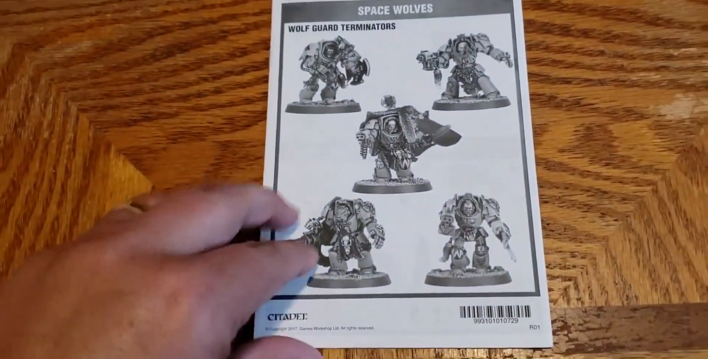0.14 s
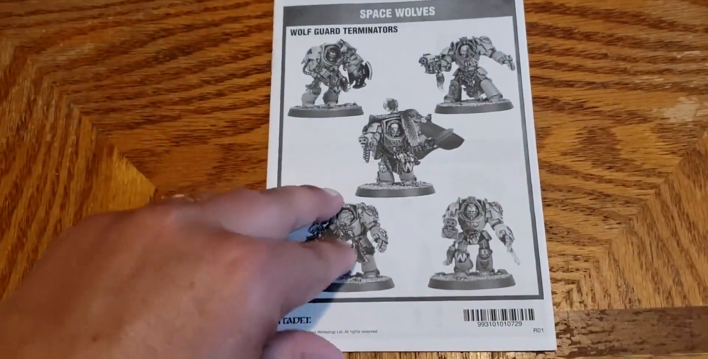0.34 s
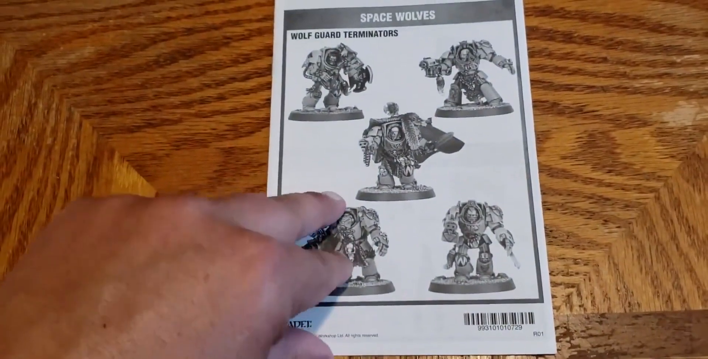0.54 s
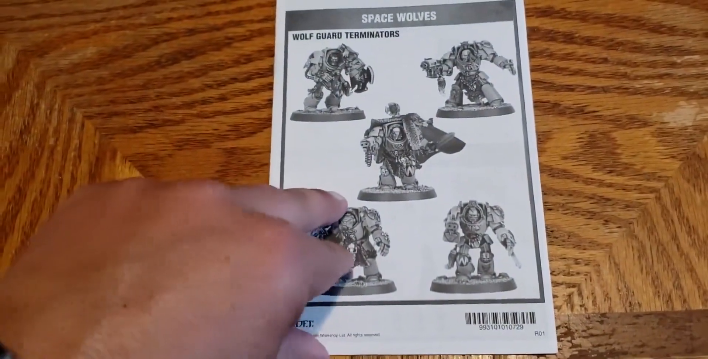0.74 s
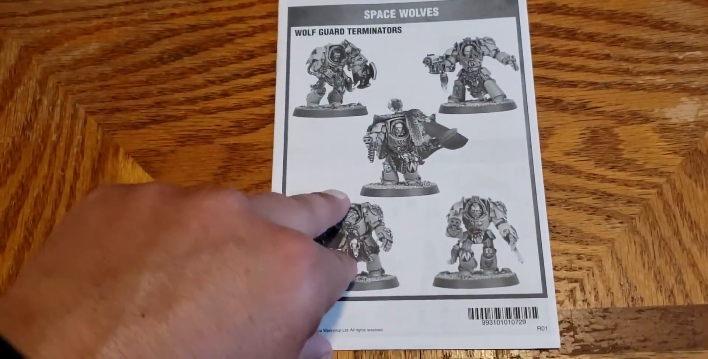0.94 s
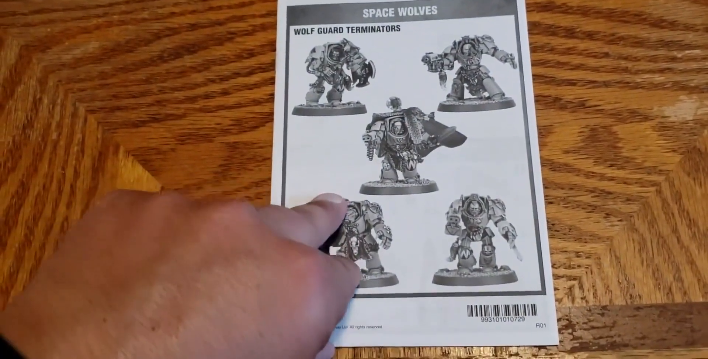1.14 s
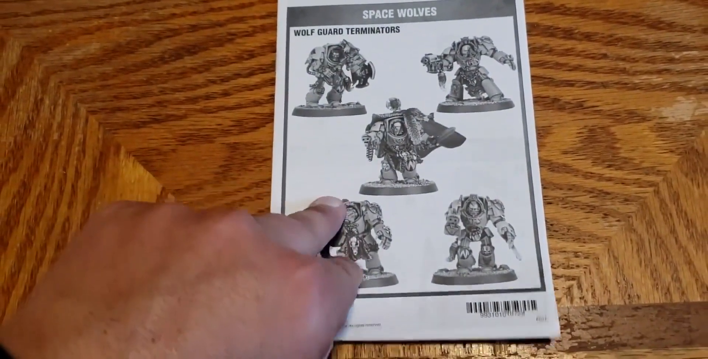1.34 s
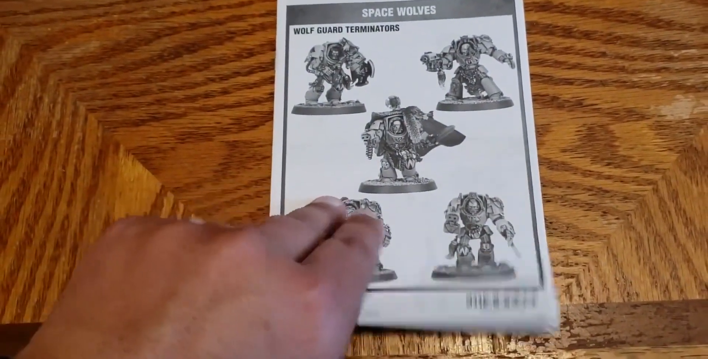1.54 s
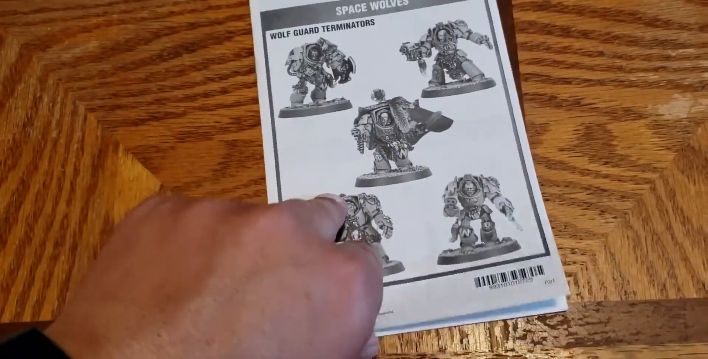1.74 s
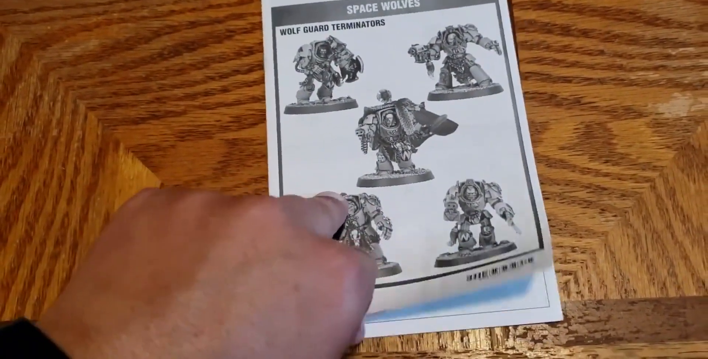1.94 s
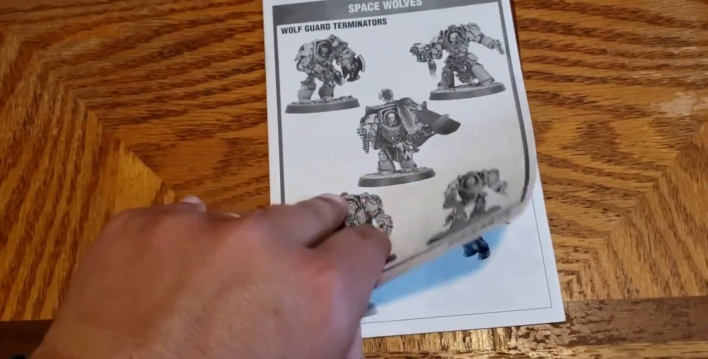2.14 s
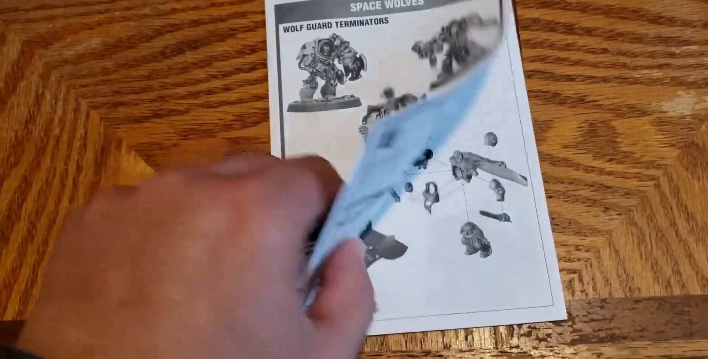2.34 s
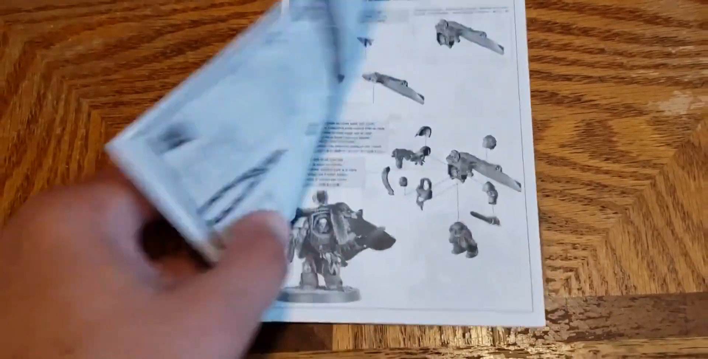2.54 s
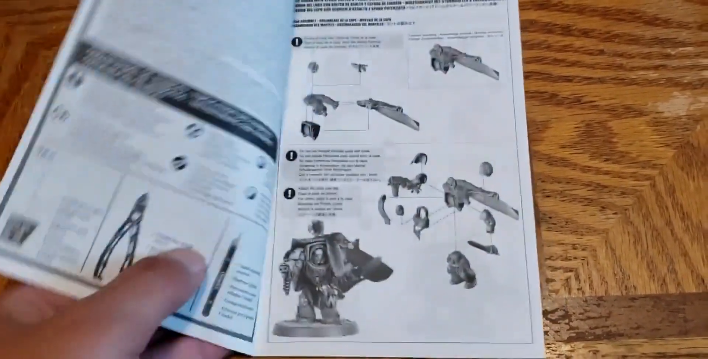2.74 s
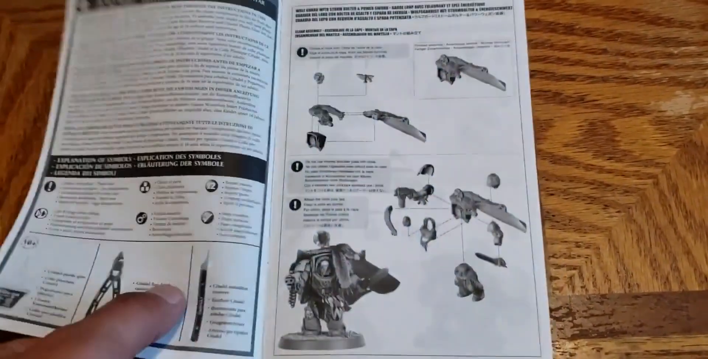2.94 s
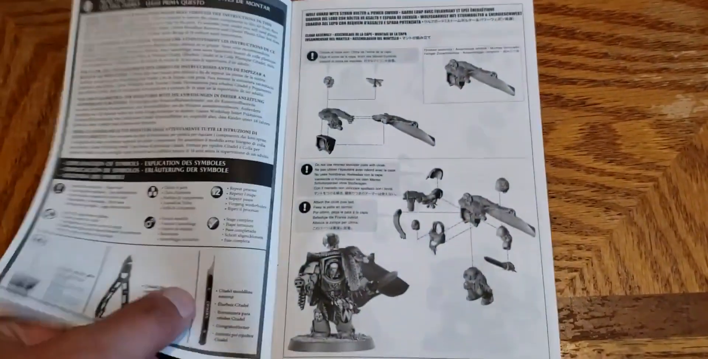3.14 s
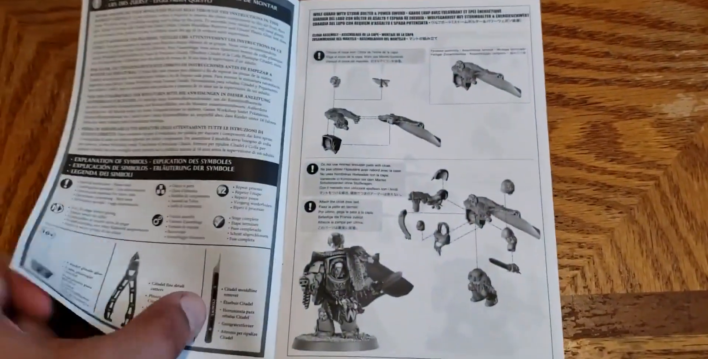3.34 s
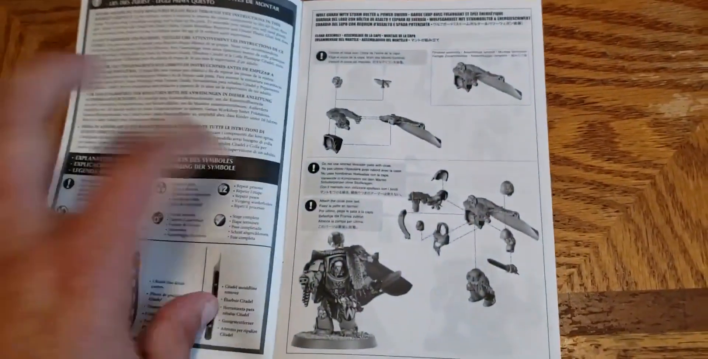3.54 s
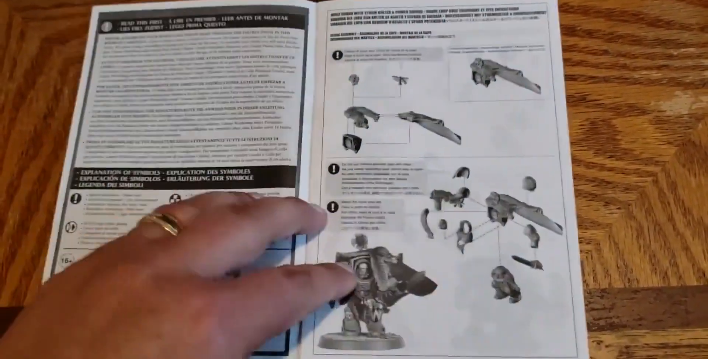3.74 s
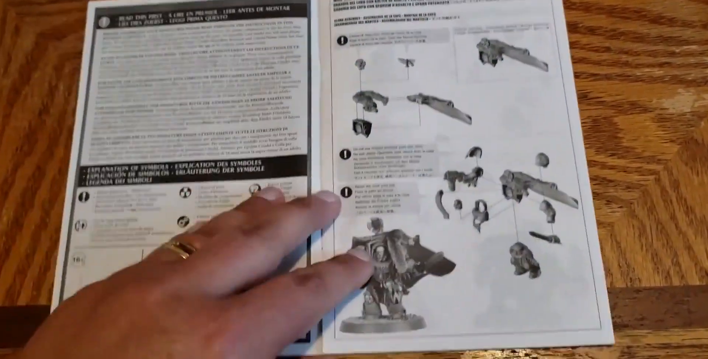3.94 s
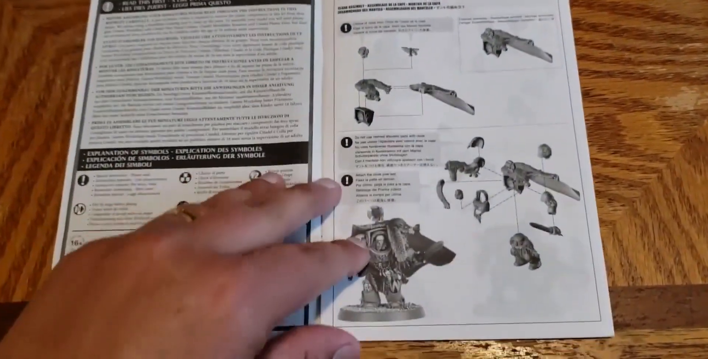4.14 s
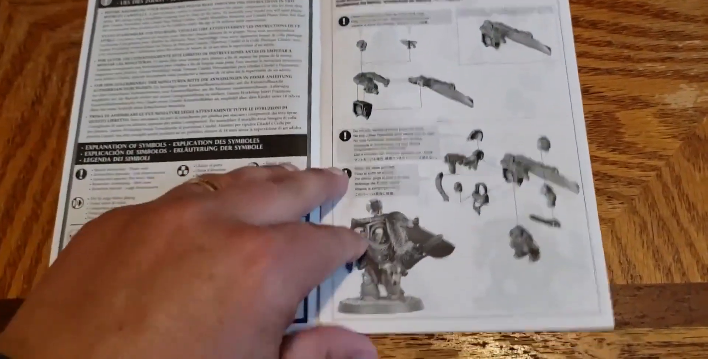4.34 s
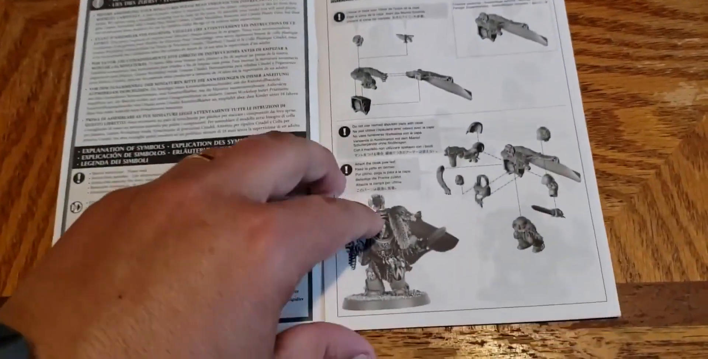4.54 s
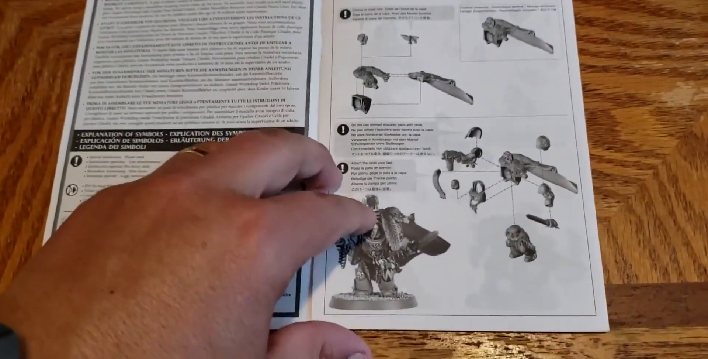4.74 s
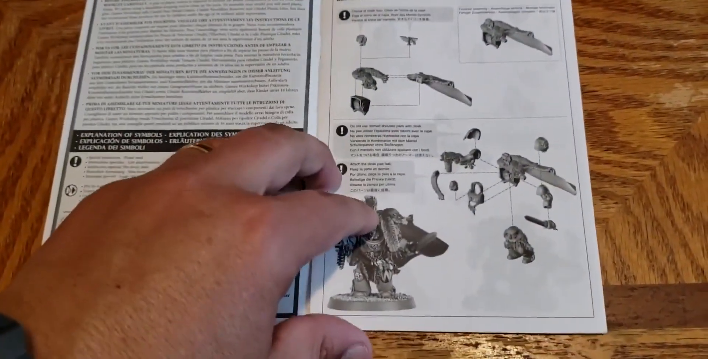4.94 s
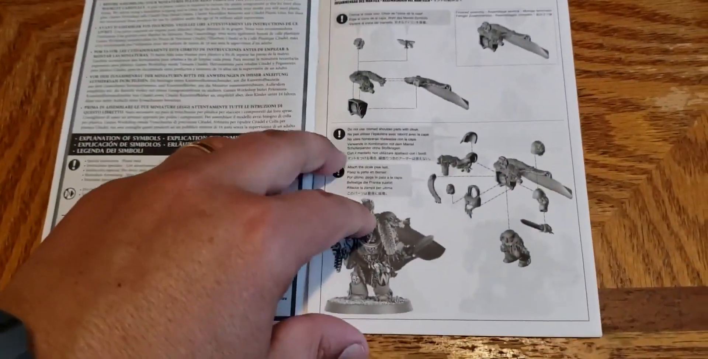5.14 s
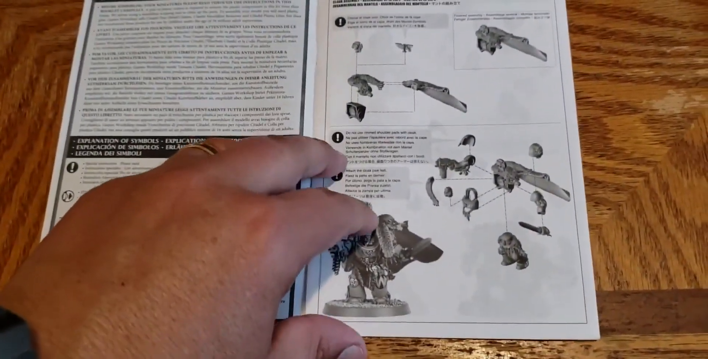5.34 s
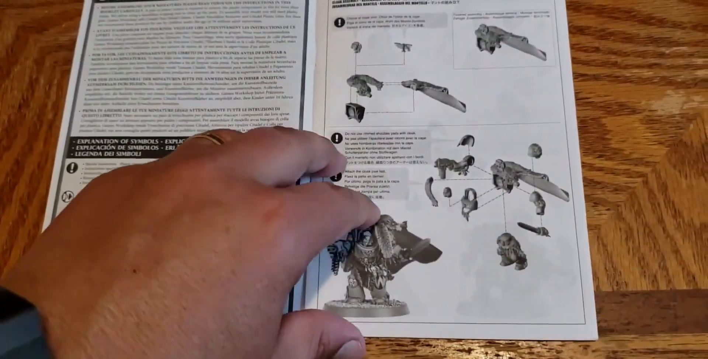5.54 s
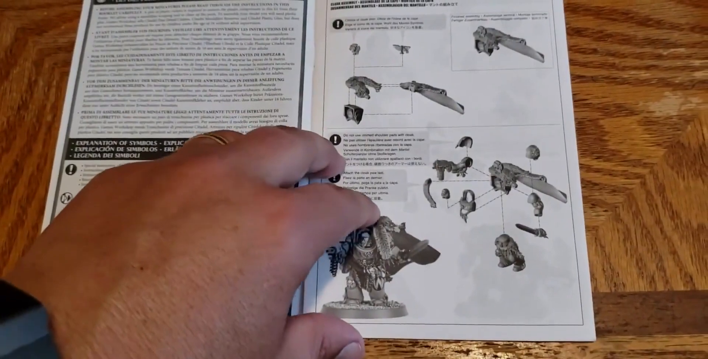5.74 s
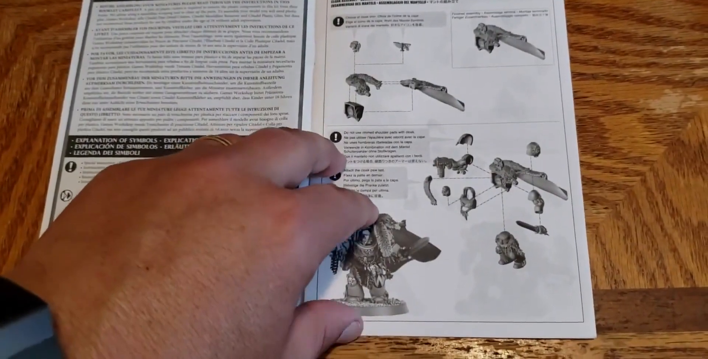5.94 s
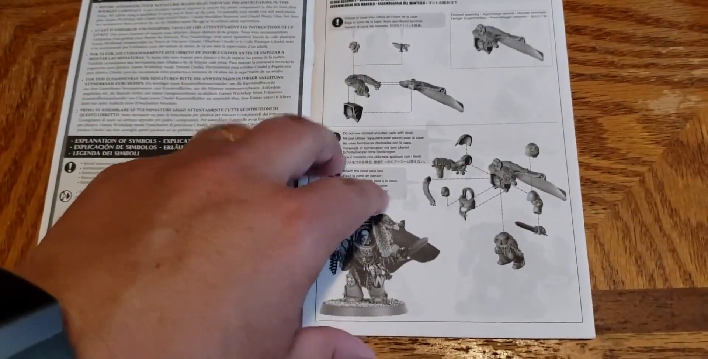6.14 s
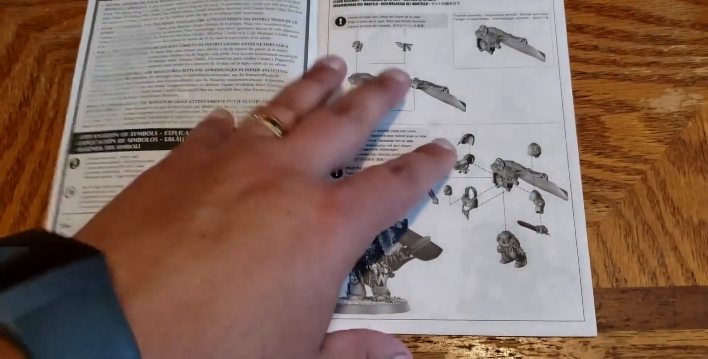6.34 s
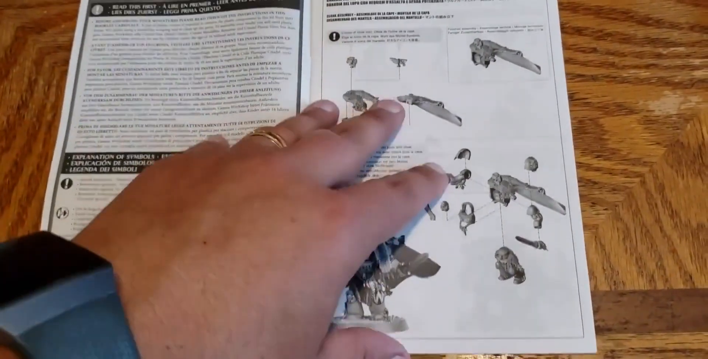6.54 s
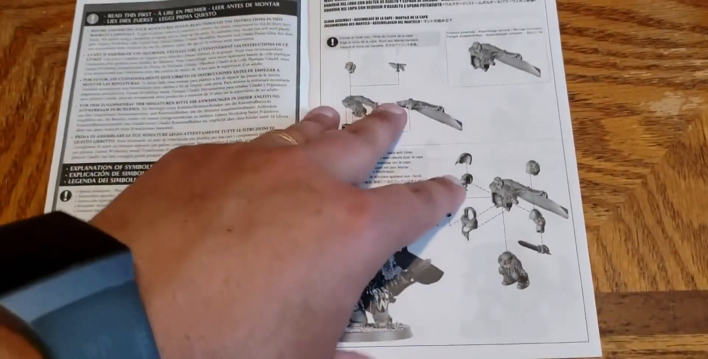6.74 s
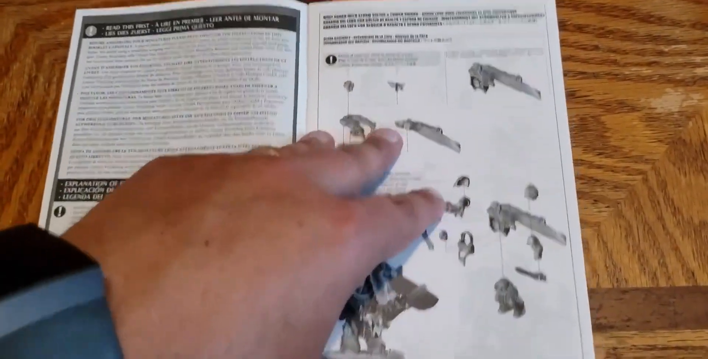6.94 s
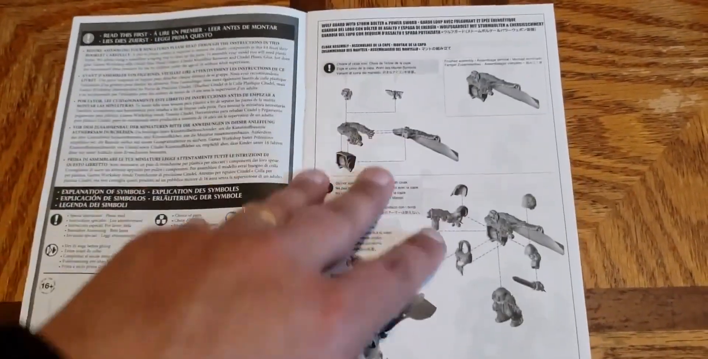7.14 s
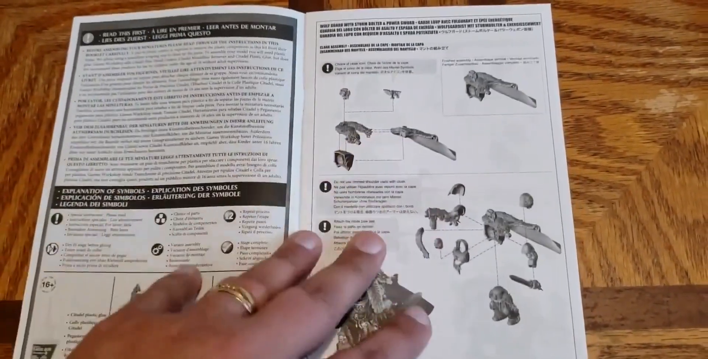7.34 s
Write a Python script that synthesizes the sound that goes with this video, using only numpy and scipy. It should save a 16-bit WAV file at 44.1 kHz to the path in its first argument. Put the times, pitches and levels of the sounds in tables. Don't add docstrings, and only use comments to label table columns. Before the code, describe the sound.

A hand faintly rubs paper, turns a booklet page with crisp rustles and sharp snaps, then smooths it lightly over a quiet room rumble.

```python
import sys
import numpy as np
from scipy import signal
from scipy.fft import rfft, irfft, next_fast_len
from scipy.io import wavfile
from scipy.ndimage import uniform_filter1d, map_coordinates

SR = 44100
rng = np.random.default_rng(int(sys.argv[2]) if len(sys.argv) > 2 else 0)


def file_out(sig):
    cols = np.atleast_2d(sig).T
    lim = np.clip(cols, -1, 1)
    pcm = np.round(lim * 32767).astype(np.int16)
    wavfile.write(sys.argv[1], SR, pcm)


def volts_from_db(level):
    exponent = np.asarray(level, float) / 20
    return 10 ** exponent


N = 326340

# (peak time [s], scrape level [dB], rise [s], fall [s], rustle re scrape [dB])
SEEK_STROKES = [(.09, -76.5, 0.48, 0.15, 1), (.174, -75.5, 0.016, 0.21, 4), (.36, -69.5, 0.25, 0.33, -2.5),
                (.776, -65, 0.035, 0.35, -1.5), (.894, -56.5, 0.21, 0.066, -8),
                (1.27, -88.5, 0.036, 0.092, 14), (1.48, -65, 0.23, 0.21, -9),
                (1.706, -66, 0.038, 0.15, 17.5), (1.748, -48, 0.043, 0.086, -4.5),
                (1.874, -59.5, 0.033, 0.1, 6), (1.916, -53, 0.085, 0.11, -18),
                (2.0, -63, 0.067, 0.048, 1.5)]
# (peak time [s], scrape level [dB], rise [s], fall [s], rustle re scrape [dB])
TURN_STROKES = [(2.226, -50, 0.012, .14, 2), (2.45, -54, 0.44, .7, -2.7), (2.716, -53.5, 0.16, .15, -9.5),
                (2.88, -61.5, 0.18, .3, -2.5), (3.052, -43.5, 0.12, .2, -3.5), (3.16, -54.5, 0.12, .2, -5),
                (3.205, -40, 0.17, .1, -2.5), (3.306, -39, 0.07, .055, -6), (3.4, -54.5, 0.46, .6, 2.5),
                (3.514, -50.5, 0.87, .3, -12.5), (3.56, -40, 0.051, .035, 0), (3.575, -54, .02, 0.07, -6.5),
                (3.712, -51.5, 0.01484, .05, -10.5), (3.782, -35.5, 0.031, .078, -2.5),
                (3.92, -61, 0.21, .1, 2.5)]
# (peak time [s], scrape level [dB], rise [s], fall [s], rustle re scrape [dB])
SMOOTH_STROKES = [(4.045, -60.5, 0.11, 0.17, 5.5), (4.154, -65, .3, .08, -2.5),
                  (4.327, -57, 0.049, 0.42, -6), (4.457, -51.5, 0.043, 0.18, -3),
                  (4.65, -65.5, 0.47, 0.056, -1.5), (4.775, -63, 0.023, 0.146, 2),
                  (5.085, -68.5, 0.045, .14, -3.5), (5.234, -76, 0.187, 0.57, -0.5),
                  (5.334, -77.5, 0.44, 0.052, 2), (5.505, -70.5, 0.085, 0.11, -4),
                  (6.032, -59.5, 0.0258, 0.0523, -1), (6.14, -72.5, .045, 0.143, -2),
                  (6.29, -60, 0.03, 0.091, -8), (6.533, -61.5, .03, .03, 7.5), (6.614, -61, 0.131, 0.27, 1),
                  (6.729, -63, 0.23, 0.029, 1.5), (6.814, -62, 0.086, 0.17, -2.3),
                  (7.0, -56.5, .04, 0.301, -0.5), (7.075, -52, 0.11, 0.087, 2.5),
                  (7.342, -51.5, 0.41, 0.51, -4.5)]
# (peak time [s], sheet level [dB], rise [s], fall [s], flap re sheet [dB])
BENDS = [(1.675, -48.5, 0.024, 0.15, -54), (1.74, -54, 0.15, 0.041, -42), (1.994, -69, 0.017, 0.032, -31),
         (2.228, -41.5, .02, 0.098, -14), (2.33, -54.5, 0.14, 1, -16.5), (2.8, -59, 0.85, 0.28, -13),
         (3.06, -42, 0.085, 0.055, -0.5), (3.16, -53.5, 0.1, 0.058, 5), (3.218, -42, 0.138, 0.029, -3.5),
         (3.288, -45.5, 0.053, 0.16, -5), (3.42, -49.5, 0.58, 0.59, -39), (3.566, -34, 0.015, 0.025, -3.5),
         (3.585, -51, .03, 0.017, 15), (3.718, -70.5, .06, .1, -12), (3.788, -36.5, .04, 0.055, -4.5),
         (3.86, -64.5, .05, 0.18, -27), (4.094, -74.5, .3, 0.087, -34), (4.478, -51.5, .027, 0.051, -10),
         (4.77, -64, 0.042, 0.18, -6.5), (6.535, -54, 0.053, 0.044, -7.5), (6.628, -63, 0.31, 0.24, -11),
         (7.088, -46, 0.13, 0.091, -10.5), (7.25, -63, 0.26, 0.43, -44), (7.395, -60, .3, .1, -53)]
# (time [s], left-right [dB])
HAND_PAN = [(0, -1), (.8, -5.5), (1.7, -5), (2.3, -2.5), (2.9, -3.5), (3.1, -0.5), (3.6, -0.5),
            (4.05, -0.5), (4.8, -2), (5.2, -5), (6.1, -1), (6.8, -1), (7.4, -.1)]
# (frequency [Hz], density [dB per Hz])
SCRAPE_SPECTRUM = [(1900, -43), (4000, -25.5), (7000, -33), (9000, -2.5), (12000, 6), (15500, 4)]
# (frequency [Hz], density [dB per Hz])
RUSTLE_SPECTRUM = [(1900, -42), (2500, -21), (3500, -13), (4300, -5), (5300, -2), (6300, -3), (8500, -6.5),
                   (12000, -20)]
# (frequency [Hz], density [dB per Hz])
SHEET_SPECTRUM = [(1200, -53), (2000, -7.5), (2400, 4), (3200, -2), (4200, 2.5), (6500, -66)]
# (frequency [Hz], density [dB per Hz])
FLAP_SPECTRUM = [(250, -36), (600, -6), (1000, -6.5), (1500, 2), (2000, 4.5), (2600, -12.5), (3500, -49)]

# (time [s], peak level [dB], centre [Hz], t60 [s], left-right [dB])
SLIPS = [
    (4.59, -55, 3000, 0.4, 2.5),
    (1.667, -68, 3450, 0.061, -6),
    (2.7087, -36.5, 4980, 0.02, -8),
    (3.708, -40.5, 4000, 0.072, -4.5),
    (3.7559, -28, 3500, 0.02, -7),
    (4.4423, -40, 12100, 0.058, -2.5),
    (4.585, -50.5, 6020, 0.029, 1.5),
    (5.0522, -56, 7900, 0.16, -5),
    (6.0157, -44.5, 7880, 0.057, -7),
    (6.986, -50, 6310, 0.072, -13),
]
# (time [s], peak level [dB], centre [Hz], t60 [s], left-right [dB])
GLIDES = [
    (0.38, -49, 6300, .15, -1.5),
    (.218, -51.5, 4300, 0.44, -1.5),
    (1.972, -48.5, 12300, 0.17, -13.5),
    (1.022, -50, 5100, 0.11, -6),
    (6.13, -45, 7800, .06, -4.5),
    (6.274, -55, 4500, 0.048, -2.5),
    (6.47, -43, 6100, 0.046, -1.5),
]
# (time [s], peak level [dB], centre [Hz], t60 [s], left-right [dB])
TICKS = [(1.667, -44, 3900, .2, -8), (4.317, -51, 5900, .7, -3.5), (1.596, -60, 6200, .08, -4),
         (1.5688, -53, 6000, .06, -4), (3.7013, -40, 6700, .02, 2), (3.7015, -36, 11000, .04, 2),
         (4.4423, -41, 13500, .06, -3), (4.5852, -33, 14300, .02, -6), (4.5968, -35, 14600, 0.012, -5.0),
         (4.6132, -29, 14700, 0.025, -4), (4.6245, -40, 13800, .025, -4), (4.756, -55, 6000, .3, -1),
         (4.7613, -55, 6300, .3, -1), (6.66, -57, 5600, .5, 0), (4.447, -38, 13000, .015, -3),
         (4.512, -46, 7000, .05, -2), (1.976, -56, 3300, .25, -6), (2.1, -57, 5700, .3, -3)]
# (time [s], peak level [dB], pitch [Hz], t60 [s], left-right [dB])
WOBBLES = [(1.5688, -52.5, 2550, 0.091, -6), (2.707, -49, 503, 0.04, -2), (2.843, -52.5, 910, 0.11, -6),
           (3.145, -45.5, 695, 0.065, 0), (3.203, -40.5, 1000, 0.097, 0.5), (3.772, -42, 686, .05, -3),
           (3.785, -35.5, 1010, 0.062, 1.5), (3.135, -39, 1130, 0.085, -3), (2.912, -48, 1060, 0.16, 0),
           (2.945, -47, 1030, 0.14, -4), (3.048, -30, 1708, 0.022, -6), (3.202, -18.5, 1990, 0.011, 8),
           (3.313, -44.5, 3000, 0.043, -10), (3.568, -34.5, 980, .09, 1)]
# (time [s], peak level [dB], centre [Hz], t60 [s], left-right [dB])
DRAGS = [
    (2.72, -47.5, 660, .8, -4.5),
    (2.47, -50.5, 1110, 0.63, -2.5),
    (3, -47.5, 1100, 0.36, -10),
    (0.092, -49, 360, 0.94, 3.5),
    (.82, -51, 477, 0.83, 0),
    (0.23, -47.5, 483, 0.78, 0),
    (5.38, -56.5, 1100, 0.45, 4),
]

# (time [s], peak level [dB], pitch [Hz], t60 [s], table thump re peak [dB])
SNAPS = [(2.2301, -25, 3000, .003, -11), (3.056, -33, 1600, .006, -20), (3.0636, -20, 1700, .002, -20),
         (3.0637, -24, 1150, .005, -20), (3.082, -36, 1800, .006, -20), (3.2786, -20.5, 1900, .006, -20),
         (3.289, -35, 1900, .008, -20), (3.314, -34, 3000, .005, -20), (3.557, -33, 6500, .004, -20),
         (3.5643, -16, 5000, .004, -21), (3.5646, -21, 3700, .004, -20), (3.5664, -21, 2700, .004, -20),
         (3.7028, -37, 6500, .008, -20), (3.7556, -33, 3500, .003, -15), (3.7865, -31, 1000, .02, -20),
         (3.568, -31, 2350, .03, -12), (3.7755, -25, 2400, .006, -13), (3.7851, -19.5, 6300, .004, -17),
         (3.7886, -10.5, 6200, .004, -16), (3.789, -24, 3500, .007, -18), (6.5302, -32, 6300, .003, -18),
         (6.5304, -37, 3300, .004, -18), (6.5303, -35, 4700, .003, -18)]
# (frequency [Hz], width [Hz], level [dB])
TABLE_MODES = [(190, 30, 4), (264, 66, -5), (356, 30, -8), (1000, 120, 2)]
# (time [s], peak level [dB], pitch [Hz], t60 [s], left-right [dB])
THUDS = [
    (3.56, -43.5, 170, 0.19, -1),
    (3.22, -45.5, 370, 0.11, -0.5),
    (3.81, -43, 380, .1, -1.5),
    (2.4, -41.5, 200, .07, 0),
    (2.4, -43, 130, .08, 0),
    (3.778, -37, 190, .15, -0.5),
    (3.8, -37.5, 120, .12, 0),
    (3.803, -39.5, 230, .1, -0.5),
    (2.7, -46, 450, .1, 4),
]
# (frequency [Hz], gain [dB])
TABLE_ECHO = [(900, 0), (1500, -2.5), (2300, 0), (3300, 0), (4300, -4), (5200, 0)]

# (frequency [Hz], t60 [s])
WALLS = [(200, 0.32), (2000, 0.29), (12000, 0.05)]
# (time [s], rumble level [dB])
HOUSE_SWELL = [(0, -61.5), (.4, -59), (.99, -62), (1.27, -56.5), (1.57, -59.5), (2.3, -59.5), (2.74, -59.5),
               (3.11, -59), (3.9, -59.5), (4.1, -59), (4.27, -65), (4.42, -55), (4.82, -60), (5.6, -61),
               (5.91, -60.5), (6.82, -60.5), (7.08, -55.5), (7.4, -61)]
# (frequency [Hz], density [dB per Hz])
RUMBLE_SPECTRUM = [(12, -58), (20, -13), (37, -21), (67, -2), (86, 3), (119, -11.5), (145, -8),
                   (222, -14.5), (250, -12.5), (296, -21), (317, -20), (445, -31), (476, -28), (604, -31.5),
                   (1150, -40.5), (1500, -73), (2530, -120)]
# (frequency [Hz], left-right likeness [0-1])
PORT_LIKENESS = [(25, .85), (60, 0.97), (180, 0.93), (550, 0.72), (1650, .3)]
# (frequency [Hz], density [dB per Hz])
HISS_SPECTRUM = [(700, -30), (1200, -1), (2300, 0), (3200, -3), (5000, -7), (6800, -10), (9000, -11),
                 (11000, -6), (15000, -3)]
# (frequency [Hz], left-right [dB])
PORT_COLOUR = [(1000, 1.5), (2000, 1.5), (3000, -8), (4300, 1), (6000, -3), (9000, -1.5), (15000, -0.5)]

PORT_LAG_SAMPLES = 7
SHEET_SHARED = 0.75


def unit(x):
    return x / np.sqrt(np.mean(x ** 2) + 1e-20)


def along(points, hz):
    f, value = np.transpose(points)
    return np.interp(np.log(hz + 1), np.log(f + 1), value)


def curve(rows):
    return np.interp(np.arange(N) / SR, *np.transpose(rows))


def wobble(rate_hz):
    knots = rng.standard_normal(int(N * rate_hz / SR) + 4)
    return map_coordinates(knots, [np.arange(N) * rate_hz / SR])


def filtered(x, response):
    n = x.shape[-1]
    m = next_fast_len(n + 4096)
    return irfft(rfft(x, m) * response(np.fft.rfftfreq(m, 1 / SR)), m)[..., :n]


def coloured(x, spectrum):
    return unit(filtered(x, lambda hz: volts_from_db(along(spectrum, hz))))


def sides(pan_db):
    return volts_from_db(np.array([pan_db, -pan_db]) / 2)


def second_port(grain):
    return np.sqrt(1 - SHEET_SHARED ** 2) * grain[1]


def fibres(spread_db, clump_db, patchy_db):
    z = signal.stft(rng.standard_normal((2, N)), nperseg=256)[2]
    field = uniform_filter1d(rng.standard_normal(z.shape[1:]), size=7, axis=0)
    field = uniform_filter1d(field, size=9, axis=1)
    noise = signal.istft(z * volts_from_db(patchy_db * unit(field)), nperseg=256)[1][:, :N]
    grains = volts_from_db(spread_db * wobble(900) + clump_db * (wobble(90) + wobble(22)))
    return noise * grains / np.sqrt(uniform_filter1d(grains ** 2, size=SR // 10))


def strokes(rows):
    time_s = np.arange(0, N / SR, 0.002)
    peak_s, db, rise_s, fall_s, second_db = np.transpose(rows)[:, :, None]
    span_db = 20
    distance = np.abs((time_s - peak_s) / np.where(time_s < peak_s, rise_s, fall_s))
    shape = volts_from_db(db - span_db * distance)
    gains = [np.linalg.norm(shape * g, axis=0) for g in (1, volts_from_db(second_db))]
    return [np.interp(np.arange(N) / SR, time_s, gain) for gain in gains]


def rubbing():
    scrape, rustle = strokes(SEEK_STROKES + TURN_STROKES + SMOOTH_STROKES)
    sheet, flap = strokes(BENDS)
    grain = fibres(spread_db=1.5, clump_db=0.6, patchy_db=2.4)
    high = volts_from_db(3) * scrape * coloured(grain, SCRAPE_SPECTRUM)
    high = high + volts_from_db(5) * rustle * coloured(grain, RUSTLE_SPECTRUM)
    delayed = np.roll(grain[0], PORT_LAG_SAMPLES)
    wide = np.array([grain[0], SHEET_SHARED * delayed + second_port(grain)])
    low = sheet * coloured(wide, SHEET_SPECTRUM) + flap * coloured(wide, FLAP_SPECTRUM)
    return (high + volts_from_db(-0.5) * low) * sides(curve(HAND_PAN))


def puffs(rows, grain, narrow_db, rise_s):
    out, t = np.zeros((2, N + SR)), np.arange(2 * SR // 5) / SR
    for s, db, hz, t60, pan_db in rows:
        at = round(s * SR)
        shape = volts_from_db(-60 * t / t60) * (1 - np.exp(-t / rise_s))
        band = lambda f: volts_from_db(-narrow_db * np.log2((f + 1) / hz) ** 2)
        puff = unit(shape * filtered(grain[:, at:at + len(t)], band))
        level = volts_from_db(db - 6) * np.sqrt(np.mean(shape ** 2))
        out[:, at:at + len(t)] += level * puff * sides(pan_db)[:, None]
    return out[:, :N]


def slips():
    grain = fibres(spread_db=3, clump_db=1.5, patchy_db=1.5)
    near = np.array([grain[0], SHEET_SHARED * grain[0] + second_port(grain)])
    bright = puffs(SLIPS, grain, narrow_db=3, rise_s=0.00043)
    bright += puffs(TICKS, grain, narrow_db=30, rise_s=0.0005)
    bright += puffs(GLIDES, grain, narrow_db=3, rise_s=0.008)
    dull = puffs(WOBBLES, near, narrow_db=29.5, rise_s=0.0032)
    dull += puffs(DRAGS, near, narrow_db=22, rise_s=0.12)
    return bright + dull


def table_response(f):
    cushion = 1 / (1 + 1j * f / 520) ** 2
    modes = 0
    for k, (centre, width, db) in enumerate(TABLE_MODES):
        drive = 1j * f * width
        modes = modes + (-1) ** k * volts_from_db(db) * drive / (centre * centre - f * f + drive)
    return cushion * modes


def snaps():
    out, blows, t = np.zeros((2, N + SR)), np.zeros(N), np.arange(SR // 20) / SR
    crack_band = lambda f: volts_from_db(-5 * np.log2((f + 1) / 3300) ** 2)
    for s, db, hz, t60, thump_db in SNAPS:
        pan_db = -3.3 * np.log2(hz / 1400)
        swell = t / t60 * volts_from_db(-60 * t / t60)
        jitter = 0.4 * np.cumsum(rng.standard_normal((2, len(t))), axis=1) * np.sqrt(hz / SR)
        cycles = np.sin(2 * np.pi * hz * t + jitter)
        crack = unit(filtered(rng.standard_normal((2, len(t))), crack_band))
        burst = (cycles + volts_from_db(-12) * crack) * swell / swell.max()
        burst = burst * volts_from_db(db - 2.5) * sides(pan_db)[:, None]
        at = round(s * SR)
        left_at = at - PORT_LAG_SAMPLES
        out[0, left_at:left_at + len(t)] += burst[0]
        out[1, at:at + len(t)] += burst[1]
        blows[at] = volts_from_db(db + thump_db + 25)
    return out[:, :N] + filtered(blows, table_response)


def thuds():
    out, t = np.zeros((2, N + SR)), np.arange(SR // 5) / SR
    rise_s = 0.0066
    for s, db, hz, t60, pan_db in THUDS:
        at = round(s * SR)
        swing = volts_from_db(db - 60 * t / t60) * (1 - np.exp(-t / rise_s)) * np.sin(2 * np.pi * hz * t)
        out[:, at:at + len(t)] += swing * sides(pan_db)[:, None]
    return out[:, :N]


def walls(x):
    hz, t, z = signal.stft(rng.standard_normal((2, SR // 2)), SR, nperseg=256)
    decay = volts_from_db(-60 * t / along(WALLS, hz)[:, None])
    tail = signal.istft(z * decay, SR, nperseg=256)[1]
    tail = tail / np.linalg.norm(tail[0])
    delayed = np.pad(x, ((0, 0), (120, 0)))
    return signal.fftconvolve(delayed, tail, axes=1)[:, :N]


def room_tone():
    rumble_db = curve(HOUSE_SWELL)
    murmur_db = -71 + 0.75 * (rumble_db - rumble_db.mean())

    def mid_side(hz):
        angle = np.arccos(np.clip(along(PORT_LIKENESS, hz), -1, 1)) / 2
        return volts_from_db(along(RUMBLE_SPECTRUM, hz)) * [np.cos(angle), np.sin(angle)]

    mid, side = filtered(rng.standard_normal((2, N)), mid_side)
    pair = np.array([mid + side, mid - side])
    low = filtered(pair, lambda hz: 1 / (1 + (hz / 220) ** 4))
    gain = 1 / np.std(low)
    rumble = volts_from_db(rumble_db + 2.5 + 1.5 * wobble(5) + 1.5 * wobble(17)) * low * gain
    murmur = volts_from_db(murmur_db + 19 + 1.2 * wobble(6) + 1.2 * wobble(17)) * (pair - low) * gain
    hiss = volts_from_db(-78 + 3.5) * coloured(rng.standard_normal((2, N)), HISS_SPECTRUM)
    return rumble + murmur + hiss


def scene():
    knocks = snaps()
    paper = filtered(rubbing() + slips() + thuds(), lambda hz: volts_from_db(along(TABLE_ECHO, hz)))
    reverb = walls(volts_from_db(-17) * paper + volts_from_db(-16) * knocks)
    return paper + knocks + reverb + room_tone()


def roll_off(x):
    return signal.sosfilt(signal.butter(12, 15850, fs=SR, output="sos"), x)


def record(dry):
    top_hz = 15800
    response = lambda hz: sides(along(PORT_COLOUR, hz) * (hz > 600)) * (hz < top_hz)
    ports = filtered(dry, response)
    return roll_off(ports)


dry = scene()
out = record(dry)
file_out(out)
```